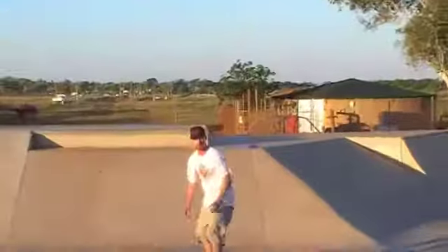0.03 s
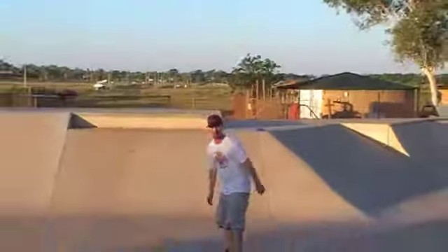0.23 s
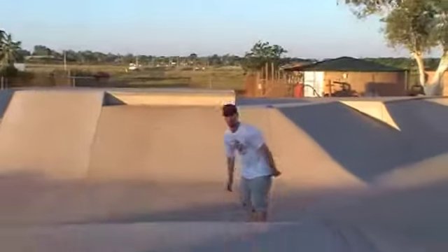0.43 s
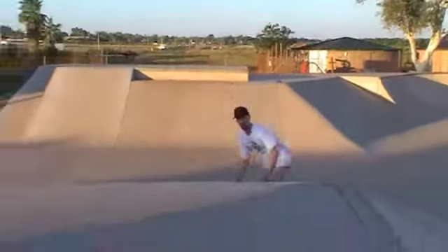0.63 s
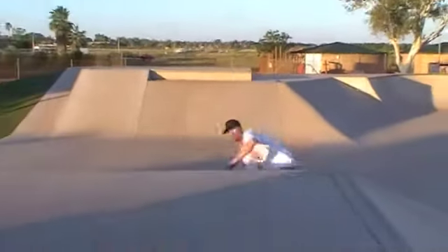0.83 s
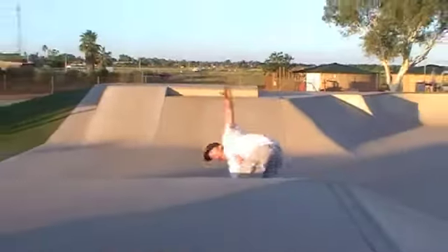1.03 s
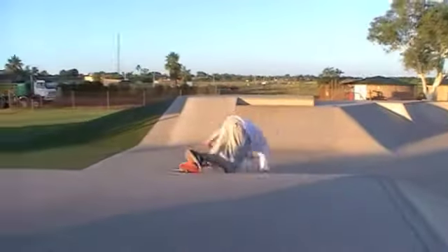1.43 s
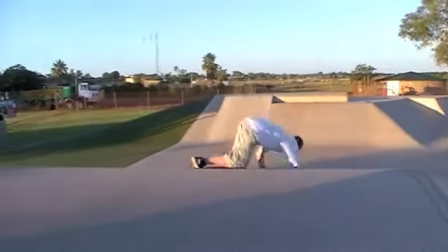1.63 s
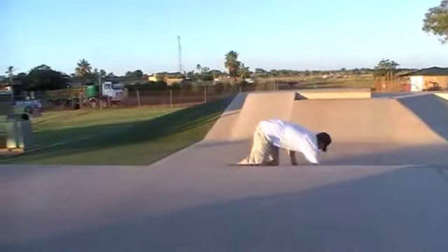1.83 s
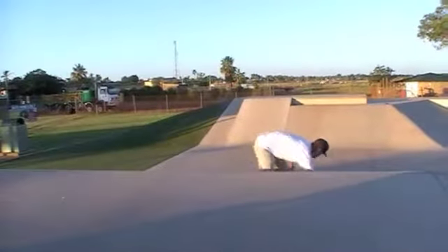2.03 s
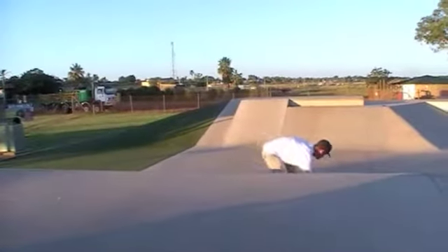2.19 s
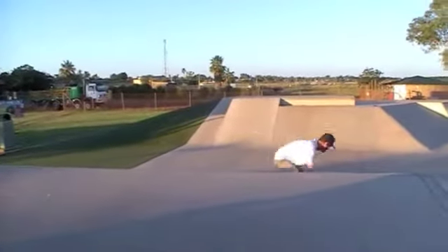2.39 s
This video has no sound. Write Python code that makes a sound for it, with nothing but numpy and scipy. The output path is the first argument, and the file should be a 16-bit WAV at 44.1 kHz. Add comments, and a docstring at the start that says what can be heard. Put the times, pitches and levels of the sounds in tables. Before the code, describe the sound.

A skateboard rolls over outdoor concrete with a low rumble, a thin bearing whirr and several knocks across joints, giving a bright clack at about 0.7 seconds. From 1 second the wheels slide sideways in a rough, wavering squeal over a gritty, hissing scrape, fading by 2 seconds. A second metallic clack comes just after, and the board rolls on quietly until about 2.5 seconds.

```python
"""A skateboard rolls over an outdoor concrete bank, knocking across joints, and gives a bright clack.
At about 1 s it is thrown sideways into a long slide: the wheels stick and slip in a rough squeal,
while grit scrapes and hisses under them. Near 2 s they grip again, a second metallic clack sounds,
and the board rolls off quietly."""
import sys
import numpy as np
from scipy import signal
from scipy.fft import rfft, irfft
from scipy.io import wavfile
from scipy.ndimage import map_coordinates

SR = 44100
rng = np.random.default_rng(int(sys.argv[2]) if len(sys.argv) > 2 else 0)


def wav_record(signal):
    """Record a signal, one row per channel, as 16-bit PCM in the file named by sys.argv[1]."""
    frames = np.transpose(np.atleast_2d(signal))
    bounded = np.clip(frames, -1, 1)
    # unit amplitude maps onto the largest positive 16-bit level
    quanta = np.round(bounded * 32767).astype(np.int16)
    wavfile.write(sys.argv[1], SR, quanta)


N = 112454
T = np.arange(N) / SR
FREQS = np.fft.rfftfreq(N, 1 / SR)


def amp(db):
    return 10 ** (np.asarray(db) / 20)


def unit(x):
    """Scale a signal to an average power of 1."""
    return x / np.sqrt(np.mean(x ** 2) + 1e-20)


def noise():
    return rng.standard_normal(N)


def curves(rows):
    """Each column of a table, joined by straight lines in time."""
    times, *columns = np.array(rows, float).T
    return [np.interp(T, times, column) for column in columns]


def colour(x, points):
    """Turn pitches up or down along a list of (frequency [Hz], gain [dB])."""
    hz, db = np.array(points, float).T
    return irfft(rfft(x) * amp(np.interp(np.log(FREQS + 1), np.log(hz), db)), N)


def response(f, hz, width):
    """How a resonance (a pitch at which a thing likes to ring) answers frequency f."""
    return 1j * f * width / (hz ** 2 - f ** 2 + 1j * f * width)


def resonate(x, hz, width):
    return irfft(rfft(x) * response(FREQS, hz, width), N)


def wander(per_s):
    """A random drift, about 1 in size."""
    return unit(np.interp(T * per_s, np.arange(4096), rng.standard_normal(4096)))


def grit(per_s, spread_db):
    """Many tiny impacts of uneven size."""
    size = amp(spread_db * np.minimum(rng.exponential(size=N), 4))
    return unit((rng.random(N) < per_s / SR) * size * noise())


def ring(push, tones):
    """A pushed object rings with tones that each die away by 60 dB in their ring time."""
    t = T[:SR // 4]
    one_tap = sum(amp(db) * np.cos(2 * np.pi * hz * t) * 1000 ** (-t / ring_s)
                  for hz, db, ring_s in tones)
    return signal.fftconvolve(push, one_tap)[:N]


def burst(start, rise, decay):
    """A level that rises straight, then dies away."""
    return np.clip((T - start) / rise, 0, 1) * np.exp(-np.maximum(T - start - rise, 0) / decay)


def shimmer(x, depth_db=4, per_s=14, size=256):
    """Narrow bands of pitch swell and fade separately as the wheels' contact patch changes."""
    _, t, bands = signal.stft(x, SR, nperseg=size)
    targets = rng.standard_normal((len(bands), size))
    drift = np.array([np.interp(t * per_s, np.arange(size), row) for row in targets])
    return unit(signal.istft(bands * amp(depth_db * unit(drift)), SR, nperseg=size)[1][:N])


# tone of the open air (frequency [Hz], gain [dB])
AIR_COLOUR = [(25, -24), (150, -3.5), (350, 4), (600, -6), (3000, -2.5), (6000, -11), (11000, -39),
              (15500, -36)]


def air(level_db=-46):
    """The open air is a faint, low rush that wavers a little."""
    return unit(colour(noise(), AIR_COLOUR)) * amp(level_db + wander(6.9))


def bank_echo(board, level_db=-16):
    """Sound bounces off a bank, arriving ever later as the board moves away."""
    delay_s = .0085 + .004 * T
    return amp(level_db) * map_coordinates(board, [(T - delay_s) * SR], order=3)


def park_wash(board, level_db=-25, ring_s=.46):
    """Many echoes from the park blur into a short tail."""
    tail = noise() * 1000 ** (-T / ring_s) * (T > .008)
    return amp(level_db) * signal.fftconvolve(board, tail / np.linalg.norm(tail))[:N]


# loudness of the bearings (time [s], level [dB])
BEARING_LEVEL = [(0, -51), (.06, -43), (.6, -46.5), (.95, -43.5), (1.2, -39), (2.4, -53), (2.55, -49.5)]
# tone of their whirr (frequency [Hz], gain [dB])
BEARING_COLOUR = [(1500, -34), (3000, -39.5), (3900, -2), (5200, 6), (6500, 2.5), (9500, 6.5), (11500, 4.5),
                  (13000, -7), (15500, -18)]


def bearings():
    """The spinning bearings make a thin, high whirr."""
    (db,) = curves(BEARING_LEVEL)
    return shimmer(colour(noise(), BEARING_COLOUR)) * amp(db)


# brief swells along the ride (time [s], half-length [s], pitch [Hz], width [Hz], level [dB])
SWELLS = [(0.476, .025, 123, 150, -32), (.42, .15, 412.9, 14, -35.5), (0.406, 0.041, 1317, 24, -33),
          (0.69, 0.13, 1640, 680, -29.5), (0.95, 0.27, 230, 182, -44), (1.114, 0.027, 3170, 260, -22.5),
          (1.226, 0.016, 2410, 140, -21), (1.314, 0.025, 2520, 310, -20.5), (1.35, 0.053, 3130, 190, -27),
          (1.842, 0.095, 1097, 205, -28), (2.4, 0.4, 214, 330, -41.5)]


def swells():
    """Resonances swell and fade, each a narrow band of noise."""
    out = 0
    for at, half_length, hz, width, db in SWELLS:
        band = unit(resonate(resonate(noise(), hz, width), hz, width))
        out += band * amp(db) * np.exp(-((T - at) / half_length) ** 2)
    return out


# loudness of the rolling (time [s], level [dB])
ROLL_LEVEL = [(0, -2), (.025, -42), (.06, -30), (.25, -29.5), (.45, -28), (.7, -27), (.87, -24.5),
              (1.0, -25), (1.08, -20.5), (1.16, -37), (1.5, -61), (1.85, -38.5), (2.0, -40.5), (2.2, -42),
              (2.48, -39.5), (2.55, -41)]
# tone of the rolling (frequency [Hz], gain [dB])
ROLL_COLOUR = [(25, -51), (50, -14), (80, -8), (160, 0), (300, 2.5), (410, -3), (520, -3.5), (700, 5.5),
               (1200, -2), (2000, -6.5), (2500, -11.5), (2800, -63), (4000, -31), (15500, -54)]
# wheel spin (time [s], speed [turns/s], share of the noise that repeats each turn [0-1])
WHEEL_SPIN = [(0, 43, 0.43), (.38, 40.7, 0.43), (.6, 43.4, 0.88), (.8, 44, 0)]
# resonances of the deck, the plank under the rider (pitch [Hz], width [Hz], gain [dB])
LOADED_DECK = [(404, 12.5, 3.5), (670, 13.7, -12)]


def rolling():
    """Wheels drum over concrete and ring the deck; their rough tread comes round at every turn."""
    (db,) = curves(ROLL_LEVEL)
    turns_per_s, share = curves(WHEEL_SPIN)
    turn = np.cumsum(turns_per_s) / SR % 1
    wobble = 1 + .22 * np.sin(2 * np.pi * turn)
    tread = noise()[(turn * SR / turns_per_s.mean()).astype(int)]
    ground = grit(per_s=12000, spread_db=-1.5)
    drumming = colour(np.sqrt(1 - share) * ground + np.sqrt(share) * tread, ROLL_COLOUR)
    deck = sum(amp(gain) * resonate(drumming, hz, width) for hz, width, gain in LOADED_DECK)
    return unit(drumming + deck) * amp(db) * wobble


# blows to the deck: mostly wheels hitting joints, plus a thump at 0.541 s that comes round with a wheel turn
# and the low thud under the second clack at 2.143 s (time [s], blow [dB], tick [dB], contact time [s])
DECK_BLOWS = [(0.225, -13, -24.5, .003), (0.2924, -25, -26, 0.0016), (.296, -9.5, -48, 0.0023),
              (0.3754, -16.5, -30.5, 0.00054), (0.541, -17.5, -38, .002), (.7765, -9.5, -36, 0.0018),
              (0.781, -18, -39, 0.0019), (0.824, -13, -19, 0.0051), (0.906, -24, -21.5, .003),
              (0.919, -13, -23.5, 0.0075), (2.143, -18, -35, 0.0026), (2.537, -26, -65, .005)]
# tones of the struck deck (pitch [Hz], level [dB], ring time [s])
DECK_TONES = [(155, -10.5, 0.069), (393, 1.5, 0.031), (597, -8, 0.032), (798, 3, 0.026), (1270, -3, 0.027),
              (2130, 3, 0.024)]


def knocks():
    """Each blow to the deck comes with a short crunch and a dry tick."""
    push, tick_level = np.zeros(N), np.zeros(N)
    for at, blow_db, tick_db, contact_s in DECK_BLOWS:
        crunch = burst(at, .00023, contact_s) * noise()
        push += amp(blow_db) * .51 * crunch / np.linalg.norm(crunch)
        push[int(at * SR)] += amp(blow_db)
        tick_level += amp(tick_db) * burst(at, rise=.005, decay=.0039)
    # soft wheels pass only this band [Hz] to the deck
    soft_wheels = signal.butter(3, (86, 1270), "band", fs=SR, output="sos")
    deck = signal.sosfilt(soft_wheels, ring(push, DECK_TONES) * amp(-5))
    tick_colour = [(500, 10), (2600, 3), (3120, 3.5), (3700, -9), (10000, -3), (15500, -20)]
    return deck + tick_level * unit(colour(noise(), tick_colour))


# two clacks of three quick hits each (time [s], level [dB], rise [s], decay [s])
CLACK_HITS = [(0.6645, -15.5, 0.00099, 0.011), (0.673, -26, 0.0018, 0.0029), (.722, -30.5, 0.0087, 0.0068),
              (2.137, -29.5, 0.0021, 0.0057), (2.144, -20, 0.0027, 0.0046), (2.159, -28.5, 0.0018, 0.013)]
# tone of the rattle (frequency [Hz], gain [dB])
CLACK_COLOUR = [(90, -32), (500, -15), (1500, 2.5), (2800, -0.5), (4200, -1.5), (6000, -0.5), (8000, 5),
                (11000, -0.5), (13000, -6), (15500, -24)]
# metallic tones (pitch [Hz], level [dB], ring time [s])
METAL_TONES = [(2980, -3, 0.02), (5700, 2, 0.031), (7600, -3, 0.019), (9630, 6, 0.042)]


def clacks():
    """Short, bright bursts of rattle ring briefly, like metal."""
    rattle = sum(amp(db) * burst(at, rise, decay) for at, db, rise, decay in CLACK_HITS) * noise()
    body = unit(colour(rattle, CLACK_COLOUR))
    metal = unit(ring(rattle, METAL_TONES))
    return (body + amp(-6.5) * metal) * np.std(rattle)


# loudness of the sideways scrape (time [s], grinding [dB], hiss [dB])
SCRAPE_LEVELS = [(.8, -79, -78), (1.0, -27.5, -39.5), (1.077, -32, -36), (1.084, -16, -21),
                 (1.14, -22, -25.5), (1.24, -24.5, -21), (1.275, -22.5, -27.5), (1.3, -24, -21),
                 (1.425, -23, -22), (1.47, -26, -32.5), (1.51, -21.5, -27), (1.54, -23.5, -18),
                 (1.6, -25, -27.5), (1.75, -28.5, -31), (1.895, -27, -29.5), (1.94, -28.5, -35.5),
                 (2.03, -38, -40), (2.25, -44.5, -77)]
# tone of the grinding (frequency [Hz], gain [dB])
GRIND_COLOUR = [(100, -56), (250, -20.5), (420, -4.5), (500, -18), (600, -3), (750, -1.5), (1100, 4.5),
                (1400, -2), (2400, 4.5), (3000, -2.5), (3700, -15.5), (6000, -24), (15000, -46)]
# tone of the hiss (frequency [Hz], gain [dB])
HISS_COLOUR = [(1500, -42), (3500, -6), (4400, 0.5), (5000, -5), (5600, -2), (6700, -4.5), (8200, 0.5),
               (10000, 3.5), (11500, 0.5), (13000, -7.5), (15500, -20)]
# resonances of a wheel and its axle mount (pitch [Hz], width [Hz], in squeal [dB], in scrape [dB])
WHEEL_RESONANCES = [(821.5, 220, 2, 3), (1180, 60, -22, 1), (1730, 430, 2, 5.5), (2252, 60, 1, -8),
                    (2420, 150, -13, -24), (3210, 190, -9.5, 3.5), (4040, 2250, 3, -12)]


def scrape():
    """Grit grinds under the sliding wheels, ringing them, with a fine hiss on top."""
    grind_db, hiss_db = curves(SCRAPE_LEVELS)
    grains = colour(grit(per_s=6000, spread_db=1), GRIND_COLOUR)
    ringing = sum(amp(db) * resonate(grains, hz, width) for hz, width, _, db in WHEEL_RESONANCES)
    grind = unit(grains + amp(-6) * ringing) * amp(grind_db + wander(90))
    hiss = shimmer(colour(grit(per_s=12000, spread_db=1), HISS_COLOUR))
    return grind + hiss * amp(hiss_db + 1.78 * wander(130))


def stick_slip(slip_hz, db, rough, octave_db, jitter_per_s=259.6):
    """A wheel grabs and lets go at an unsteady rate; its resonances pick out the overtones."""
    jitter = 1 + .055 * rough * wander(jitter_per_s)
    phase = 2 * np.pi * np.cumsum(slip_hz * jitter) / SR
    tone = 0
    for k in (1, 2, 3):  # multiples of the slip rate
        peaks = [amp(gain_db) * abs(response(k * slip_hz, hz, width)) ** 2
                 for hz, width, gain_db, _ in WHEEL_RESONANCES]
        gain = np.linalg.norm(peaks, axis=0) * amp(octave_db if k == 2 else 0)
        blur = (k - 1) * .61 * rough * wander(jitter_per_s)  # higher overtones blur more
        tone += gain * np.sin(k * phase + blur)
    flutter_db = 4 * rough * np.tanh(wander(150))
    return tone * amp(db + flutter_db)


# squeal of the leading wheel (time [s], slip rate [Hz], level [dB], roughness [0-1])
LEAD_SQUEAL = [(.95, 796.4, -66, 0.86), (.995, 782.4, -28, 0.7), (1.06, 775.4, -22, 0.73),
               (1.09, 769, -19, 0.35), (1.125, 768.7, -16.5, 0.48), (1.14, 844.3, -20.5, 0.36),
               (1.158, 905.8, -17, 0.36), (1.174, 856.3, -19, 0.3), (1.205, 863, -13.5, 0.29),
               (1.236, 875, -18.5, .45), (1.257, 790, -19, 0.71), (1.275, 768, -17.5, 0.38),
               (1.305, 772, -17.5, 0.61), (1.355, 760, -17, 0.29), (1.455, 757, -19, 0.11),
               (1.475, 775.2, -50, 0.8), (1.535, 775, -19, 0.32), (1.6, 790.4, -28.5, 0.44),
               (1.626, 805.7, -25.5, 0.71), (1.71, 839, -28, 0.53), (1.76, 851.4, -38, 0.6),
               (1.81, 872.5, -36.5, 0), (1.9, 894, -38, 0.37), (1.95, 867, -68, 0.8)]
# its overtone at twice the slip rate (time [s], gain [dB])
LEAD_OCTAVE = [(1.125, -5), (1.148, 4.5), (1.175, 4.5), (1.2, -23), (1.23, 1), (1.26, -9.5), (1.72, -7),
               (1.81, 9)]
# a second wheel chattering along (time [s], level [dB])
CHATTER_LEVEL = [(.98, -44), (1.11, -21.5), (1.17, -34), (1.255, -22.5), (1.32, -17.5), (1.37, -42),
                 (1.63, -34.5), (1.75, -35), (1.95, -70)]


def squeal():
    """Two sliding wheels squeal at nearby pitches and beat against each other."""
    (chatter_db,) = curves(CHATTER_LEVEL)
    chatter_hz = 843.6 * (1 + .021 * wander(25))
    chatter = stick_slip(chatter_hz, chatter_db, rough=.501, octave_db=-19)
    slip_hz, db, rough = curves(LEAD_SQUEAL)
    (octave_db,) = curves(LEAD_OCTAVE)
    return stick_slip(slip_hz, db, rough, octave_db) + chatter


def scene():
    """The board, its echoes and the open air, in one channel."""
    board = rolling() + swells() + bearings() + squeal() + scrape() + knocks() + clacks()
    return (board + bank_echo(board) + park_wash(board) + air())[None]


def record(dry, top_hz=15850):
    """The sound fades in quickly; the highest treble is cut."""
    fade_in = np.clip((T - .012) / .029, 0, 1)
    treble_cut = signal.ellip(10, .2, 80, top_hz, fs=SR, output="sos")
    return signal.sosfilt(treble_cut, dry * fade_in)


dry = scene()
out = record(dry)
wav_record(out)
```